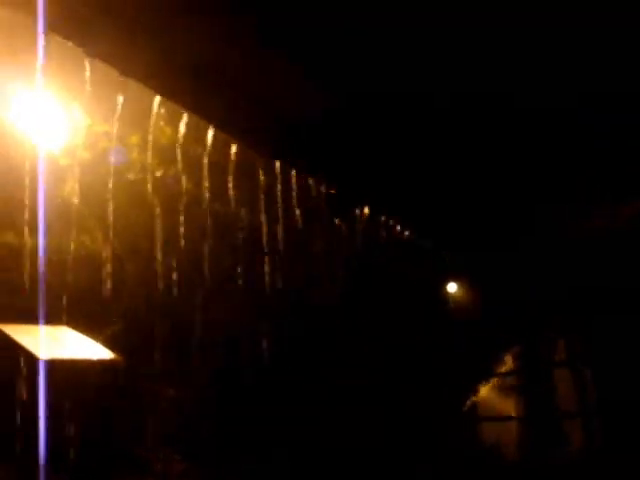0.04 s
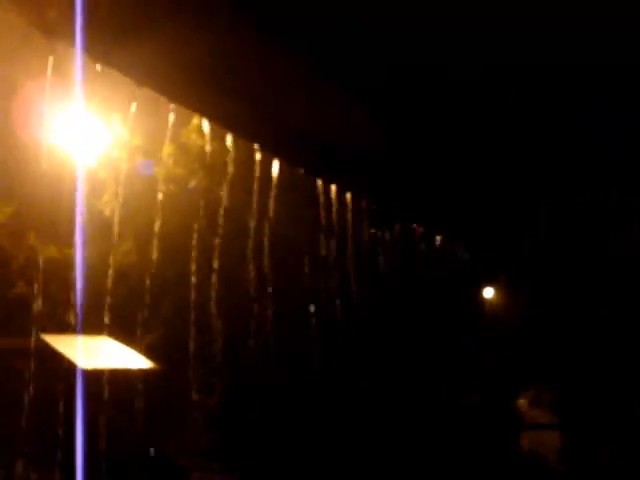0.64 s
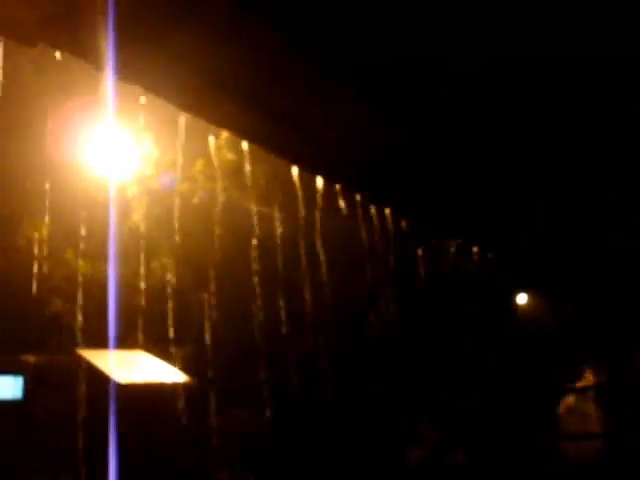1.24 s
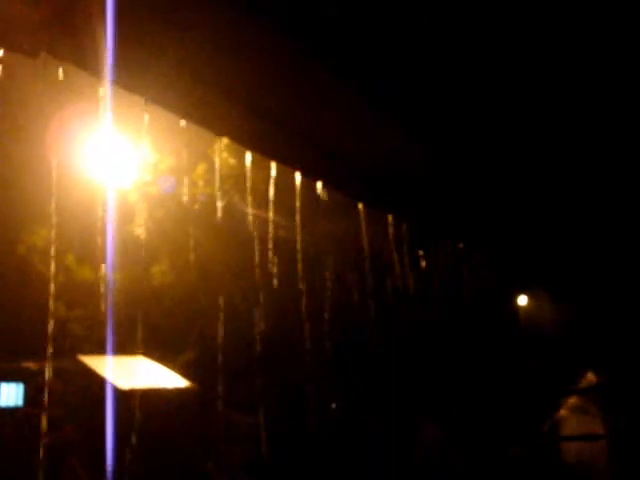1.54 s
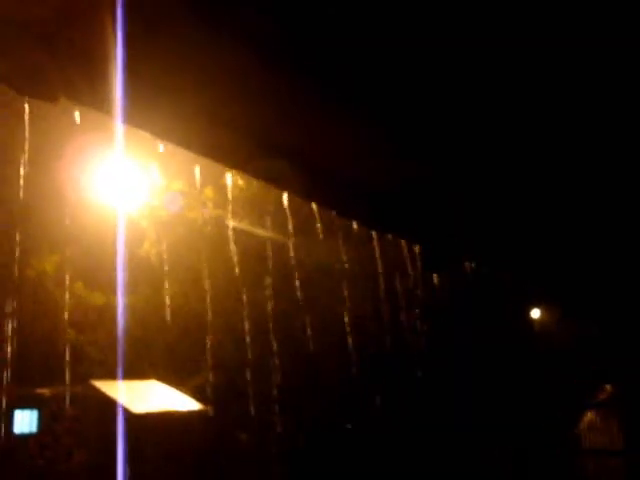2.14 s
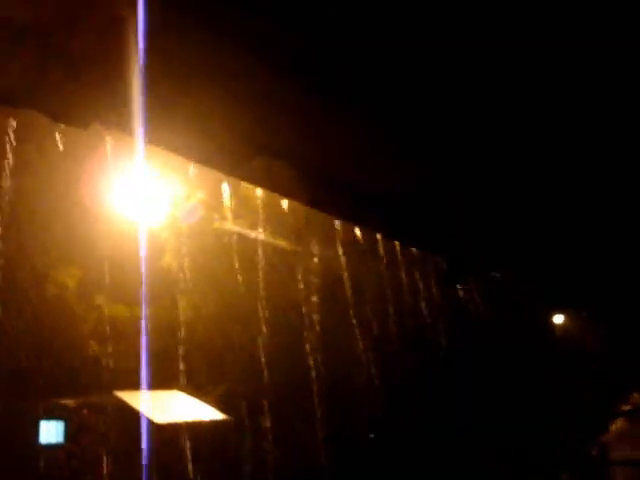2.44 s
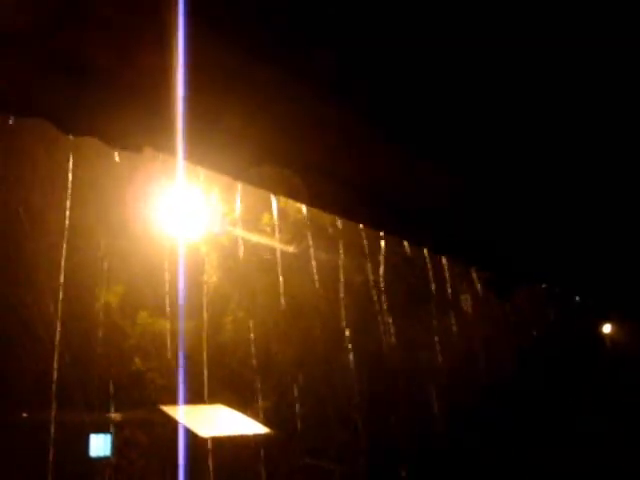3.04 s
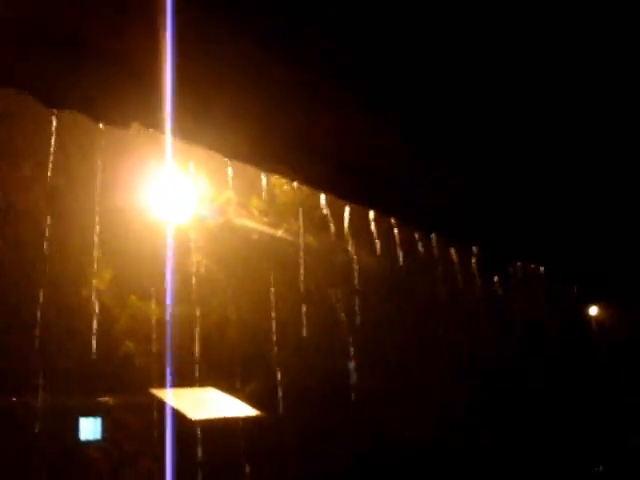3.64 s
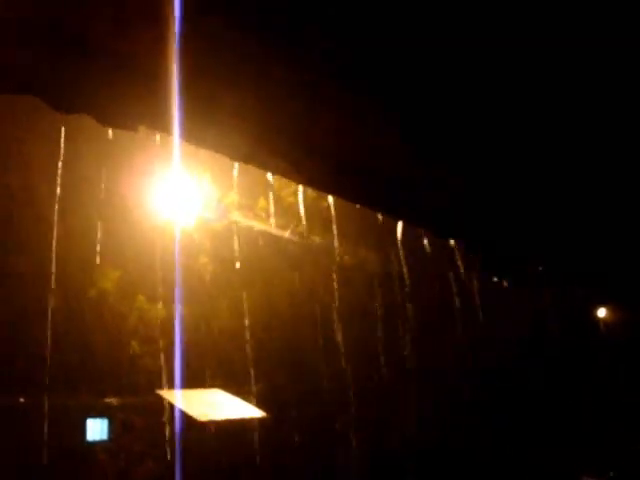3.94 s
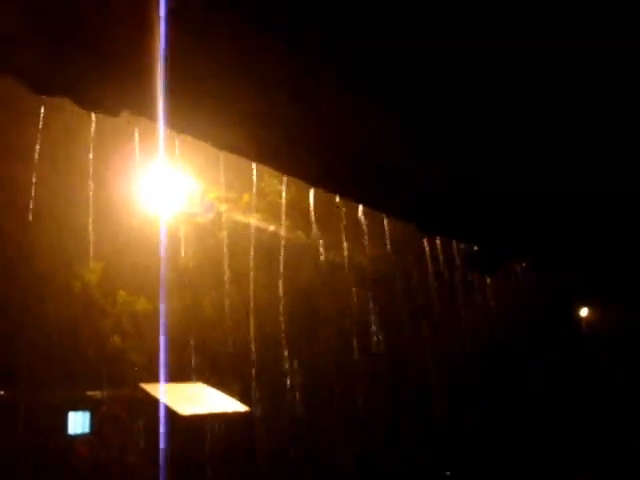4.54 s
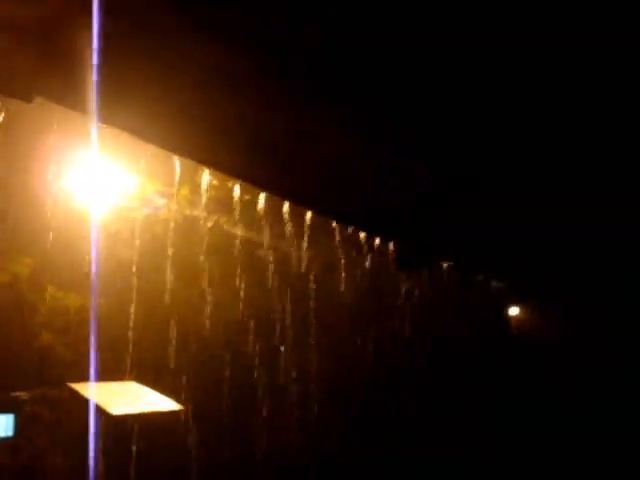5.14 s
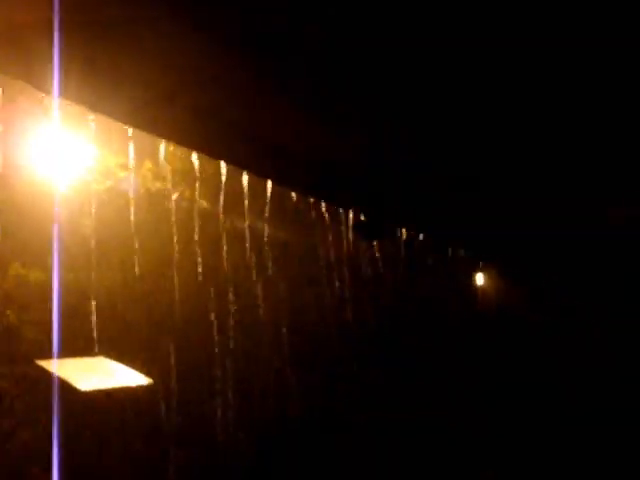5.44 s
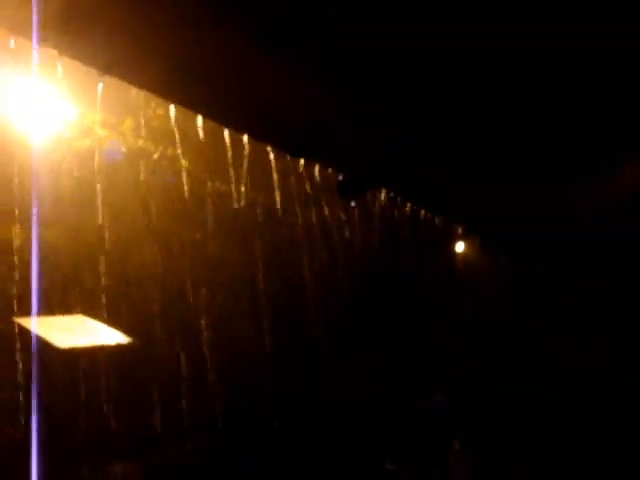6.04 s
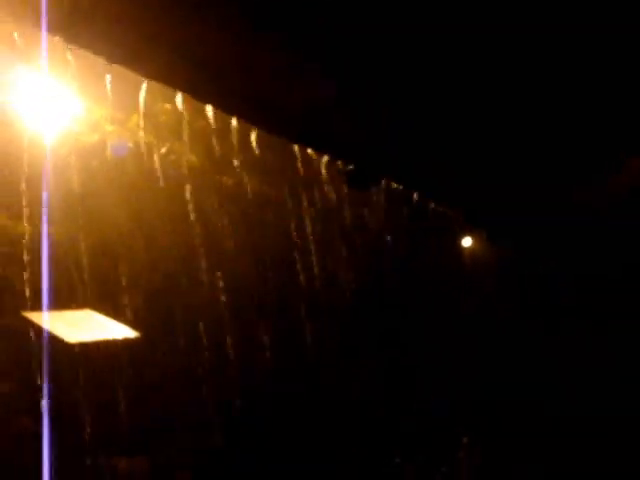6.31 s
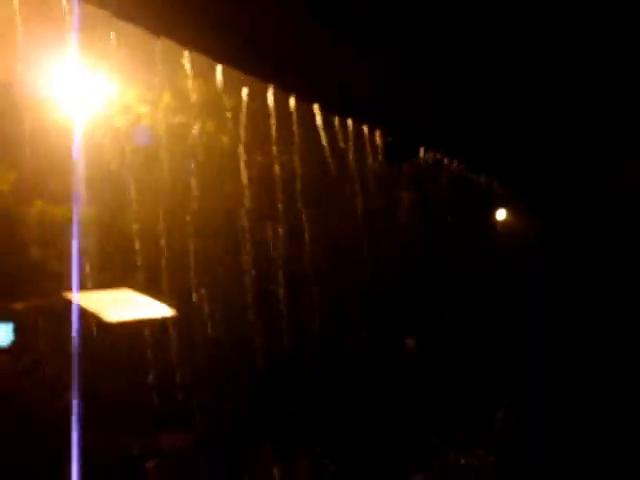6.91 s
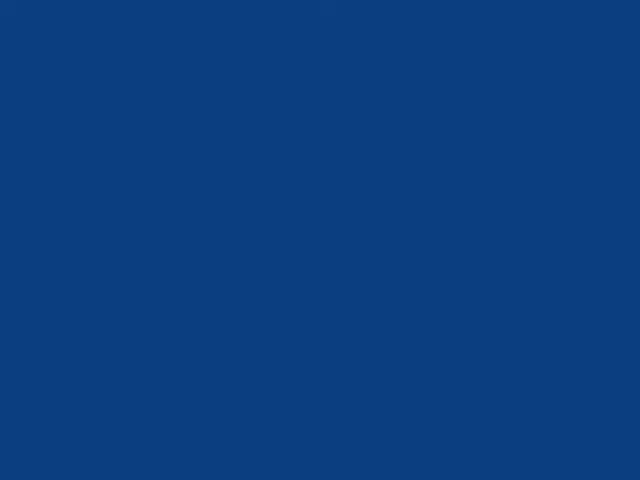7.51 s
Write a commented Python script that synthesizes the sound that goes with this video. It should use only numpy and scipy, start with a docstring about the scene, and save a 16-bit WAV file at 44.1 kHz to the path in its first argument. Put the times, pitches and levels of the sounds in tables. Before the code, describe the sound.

A steady downpour heard from under the eaves, with roof runoff slapping and plinking into nearby puddles.

```python
"""Night rain from under the eaves

Heavy rain on one mono microphone, sheltered by the overhang. Far out in the yard countless drops merge
into a wash; nearer ones spatter on wet ground and drum dully on the roof overhead. Close by, a row of
streams runs off the edge, breaks into blobs and slaps into puddles. The sound cuts off near the end."""
import sys
import numpy as np
from scipy import signal
from scipy.io import wavfile
from scipy.ndimage import uniform_filter1d

SR = 44100
rng = np.random.default_rng(int(sys.argv[2]) if len(sys.argv) > 2 else 0)


def persist_wave(psi):
    """Save psi, clipped to +-1, as 16-bit WAV."""
    counts = np.round(np.clip(psi, -1, 1) * 32767).astype(np.int16)
    wavfile.write(sys.argv[1], SR, np.atleast_2d(counts).T)


N = 342655


def gain_of(db):
    """Decibels to amplitude."""
    return 10 ** (np.asarray(db) / 20)


def unit_rms(x):
    """Scales to rms 1."""
    return x / np.sqrt(np.mean(x ** 2) + 1e-20)


def spectrum_db(points, hz):
    """Reads a spectrum on a log-frequency axis."""
    freq_hz, level_db = np.transpose(points)
    return np.interp(np.log(hz + 1), np.log(freq_hz + 1), level_db)


def colour(x, db_at):
    """Minimum-phase filter with the gain db_at(hz), so that clicks keep their sharp front."""
    hz = abs(np.fft.fftfreq(4096, 1 / SR))
    log_gain = np.log(gain_of(db_at(hz)))
    taps = np.fft.ifft(np.exp(np.conj(signal.hilbert(log_gain)))).real
    return signal.oaconvolve(x, taps[:len(taps) // 2])[:N]


def wander(top_hz, count=24):
    """Slow random drift of rms 1, no faster than top_hz."""
    t = np.linspace(0, N / SR, N // 128)
    rates_hz = np.geomspace(top_hz / 10, top_hz, count)
    drift = sum(np.sin(2 * np.pi * (hz * t + rng.random())) / np.sqrt(hz) for hz in rates_hz)
    return np.interp(np.arange(N) / SR, t, unit_rms(drift))


def impacts(per_s, spread_db):
    """Random clicks of either sign: many small, a few large."""
    size = gain_of(spread_db * np.minimum(rng.exponential(1, N), 3))
    return size * rng.choice([-1, 1], N) * (rng.random(N) < per_s / SR)


# A drop on the roof, heard from below through the roofing: freq_hz, level_db
ROOF_SPECTRUM = [(40, -29), (105, -30), (135, -16.5), (180, -19), (235, -8.5), (280, -10.5), (345, -3),
                 (410, -4), (490, 0.5), (640, -2), (900, -12), (3000, -40)]

def roof_patter(per_s, spread_db):
    """Overhead, drops thud on the roof and run together into a low patter."""
    return unit_rms(colour(impacts(per_s, spread_db), lambda hz: spectrum_db(ROOF_SPECTRUM, hz)))


def facing_yard(t, out_s, out_takes_s, back_s, back_takes_s):
    """How far the microphone has turned from the roof to the open yard, 0-1."""
    return np.clip((t - out_s) / out_takes_s, 0, 1) - np.clip((t - back_s) / back_takes_s, 0, 1)


# Rain on the wet ground of the yard, far and near alike: freq_hz, level_db
RAIN_SPECTRUM = [(25, -38), (100, -31), (180, -28.5), (330, -19.5), (500, -14.5), (720, -5.5), (1050, -1.5),
                 (1550, -3), (2300, -2.4), (3300, -5), (5250, -10.5), (9300, -17.5), (15000, -17.5)]

def far_wash(patchy_db, flicker_db):
    """Far out in the yard: drops too many to tell apart, a little denser here and there."""
    bins, frames = 257, N // 128 + 5
    real, imag, patches = rng.standard_normal((3, bins, frames))
    patches = uniform_filter1d(patches, size=9, axis=0)  # smooth across frequency
    patches = unit_rms(uniform_filter1d(patches, size=24, axis=1))  # and across time
    flicker = unit_rms(uniform_filter1d(rng.standard_normal(frames), size=8))
    spectra = (real + 1j * imag) * gain_of(patchy_db * patches + flicker_db * flicker)
    hiss = signal.istft(spectra, nperseg=512, noverlap=384)[1][:N]
    return unit_rms(colour(hiss, lambda hz: spectrum_db(RAIN_SPECTRUM, hz)))


def near_spatter(per_s, spread_db, cycles, bright_db, count=36):
    """On the ground nearby each drop ticks for a few cycles; smaller ones are higher and more numerous."""
    t, ticks = np.arange(SR // 40) / SR, np.zeros(N)
    pitches_hz = np.geomspace(900, 15000, count)
    for hz in pitches_hz:
        tick = np.exp(-hz * t / cycles) * np.sin(2 * np.pi * hz * t)
        drops = impacts(per_s * hz / pitches_hz.sum(), spread_db)
        ticks += np.sqrt(hz) * signal.oaconvolve(drops, tick)[:N]
    spatter = colour(ticks, lambda hz: spectrum_db(RAIN_SPECTRUM, hz) + bright_db * np.log2(1 + hz / 2000))
    return unit_rms(spatter)


def puddle_bubbles(per_s, low_hz, high_hz, cycles, rise, spread_db, count=60):
    """Air trapped in the puddles rings briefly and rises in pitch as it nears the surface."""
    t, plinks = np.arange(SR // 12) / SR, np.zeros(N)
    for hz in np.geomspace(low_hz, high_hz, count):
        age = hz * t / cycles
        glide = 1 + rise * np.minimum(age, 6)
        ring = np.exp(-age) * np.sin(2 * np.pi * hz * t * glide)
        plinks += signal.oaconvolve(impacts(per_s / count, spread_db), ring)[:N]
    return unit_rms(plinks)


def eaves_echo(x, wet_db, t60_s):
    """The wall and the overhang return a short diffuse tail, different for every spot on the ground."""
    t = np.arange(SR // 4) / SR
    tail = rng.standard_normal(len(t)) * gain_of(-60 * t / t60_s) * (t > .004)
    return x + gain_of(wet_db) * signal.oaconvolve(x, tail / np.linalg.norm(tail))[:N]


# Gushes off the edge of the roof: crest_s, rise_db
RUNOFF_GUSHES = [(0.6, 2.5), (2.24, 3.4), (3.05, 1.3), (3.87, 3), (4.35, 3.5), (7.11, 4)]

def gush_db(t, length_s):
    """Now and then extra water comes over the edge: a smooth swell and ebb."""
    return sum(rise_db * np.cos(np.pi * np.clip((t - crest_s) / length_s, -.5, .5)) ** 2
               for crest_s, rise_db in RUNOFF_GUSHES)


# A blob of water slapping into a puddle close to the microphone: freq_hz, level_db
SLAP_SPECTRUM = [(100, -41), (280, -27), (400, -18.5), (500, -10), (630, -6), (700, -9.5), (850, -2.5),
                 (1020, -1.5), (1330, -4), (1650, -6.5), (2300, -9), (4000, -19), (9000, -27), (15000, -36)]

def runoff_streams(blobs_per_s, spread_db, surge_db, spray, spray_s, count=12):
    """Each stream off the eaves swells and thins on its own; every blob slaps down and throws spray."""
    t, row = np.arange(SR // 25) / SR, np.zeros(N)
    spray_decay = np.exp(-t / spray_s) / (spray_s * SR)
    for _ in range(count):
        slaps = impacts(blobs_per_s, spread_db) * gain_of(surge_db * np.tanh(wander(top_hz=9)))
        spray_power = signal.oaconvolve(slaps ** 2, spray_decay)[:N]  # jumps at each slap, then dies
        splash = slaps + spray * np.sqrt(abs(spray_power)) * rng.standard_normal(N)
        row += eaves_echo(splash, wet_db=-6.0, t60_s=.18)
    return unit_rms(colour(row, lambda hz: spectrum_db(SLAP_SPECTRUM, hz)))


# How hard it pours on the yard, in a few slow swells: time_s, level_db
DOWNPOUR = [(0.0, -18.2), (0.4, -17.5), (1.0, -17.5), (2.6, -17.0), (3.1, -16.5), (4.0, -17), (4.95, -17.5),
            (5.4, -16.5), (5.95, -18), (6.4, -16.5), (6.8, -18), (7.3, -19)]

def scene():
    """From under the eaves: one downpour drives rain and runoff; the roof fades as we face the yard."""
    t = np.arange(N) / SR
    pour_db = np.interp(t, *np.transpose(DOWNPOUR))
    flow_db = 0.4 * (pour_db - pour_db.mean())  # the roof evens out each swell
    turned = facing_yard(t, out_s=1.2, out_takes_s=2.2, back_s=4.3, back_takes_s=0.6)
    far = gain_of(-0.78) * far_wash(patchy_db=0.9, flicker_db=0.3)
    near = gain_of(-4.5) * near_spatter(per_s=8000, spread_db=3.5, cycles=1.9, bright_db=0.16)
    slaps = runoff_streams(blobs_per_s=150, spread_db=2.0, surge_db=2.5, spray=0.86, spray_s=0.0062)
    plinks = puddle_bubbles(per_s=400, low_hz=879, high_hz=3407, cycles=13.5, rise=0.014, spread_db=1.8)
    puddles = gain_of(-2.5) * slaps + gain_of(-8) * plinks
    roof = gain_of(-35 - 4.5 * turned) * roof_patter(per_s=1500, spread_db=2.5)
    rain = gain_of(pour_db) * (far + near)
    runoff = gain_of(-21 + flow_db + gush_db(t, length_s=0.26)) * puddles
    return np.tile(roof + rain + runoff, (2, 1))


# The microphone's treble, with one broad dip: freq_hz, gain_db
MIC_RESPONSE = [(9000, 0.5), (9850, -0.5), (10200, -6.5), (11050, -8), (11700, -15.5), (12700, -7.5),
                (13200, -10.5), (14400, -1), (15400, -4.5)]

def record(dry, stop_s=7.319, top_hz=15470):
    """Microphone colour, an abrupt stop with a brief faint fade, and the band limit."""
    sound = np.array([colour(channel, lambda hz: spectrum_db(MIC_RESPONSE, hz)) for channel in dry])
    after_s = np.maximum(np.arange(N) / SR - stop_s, 0)
    fade = gain_of(-12.5 - 350 * after_s) * np.maximum(1 - after_s / 0.098, 0)
    sound *= np.where(after_s > 0, fade, 1)
    low_pass = signal.firwin(1023, top_hz, window=("kaiser", 9), fs=SR)
    return signal.oaconvolve(sound, low_pass[None], "same")


dry = scene()
out = record(dry)
persist_wave(out)
```